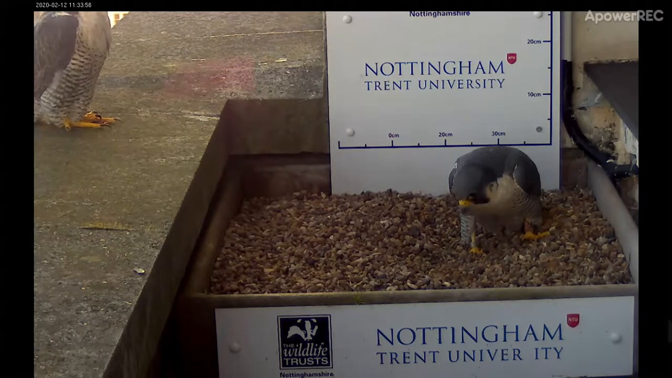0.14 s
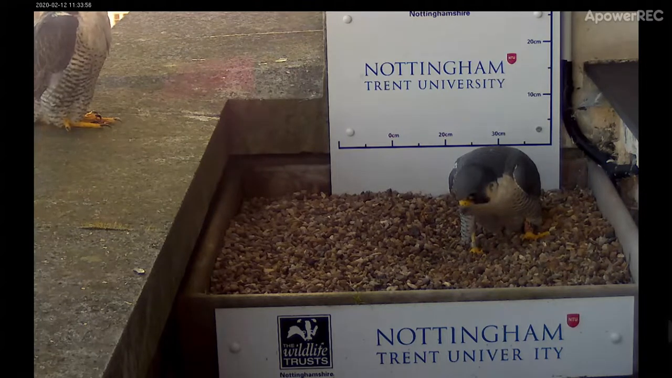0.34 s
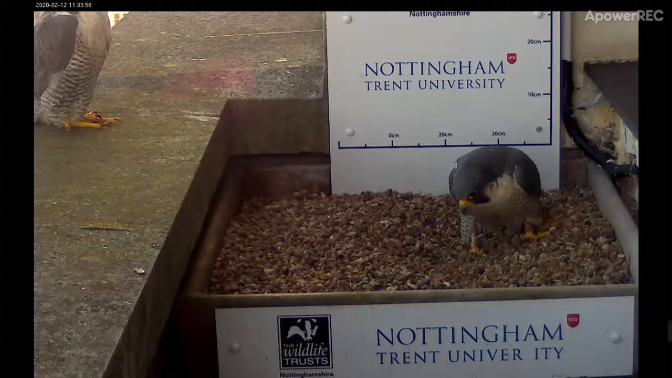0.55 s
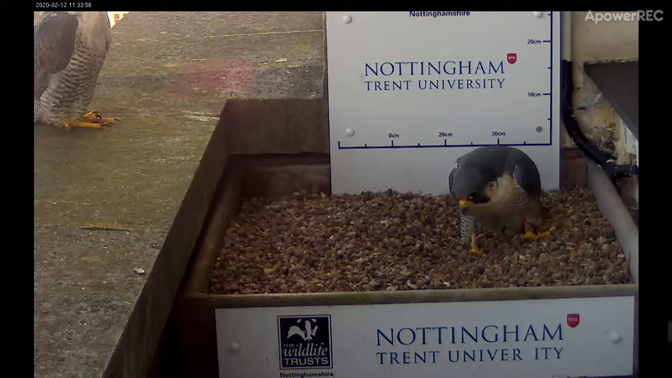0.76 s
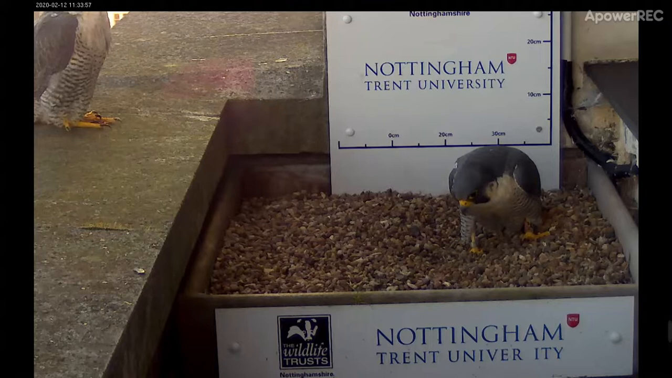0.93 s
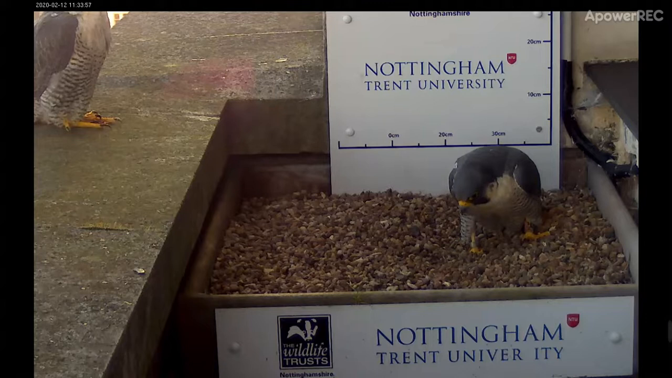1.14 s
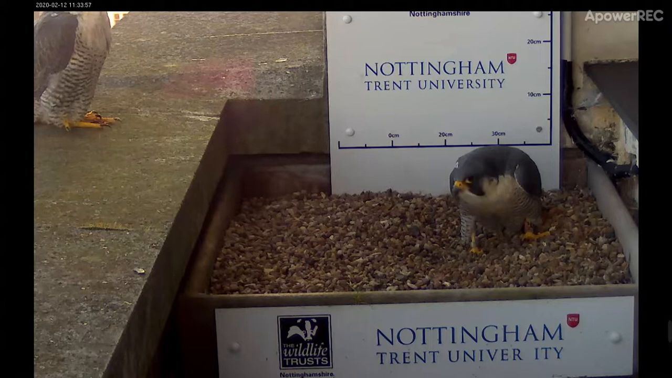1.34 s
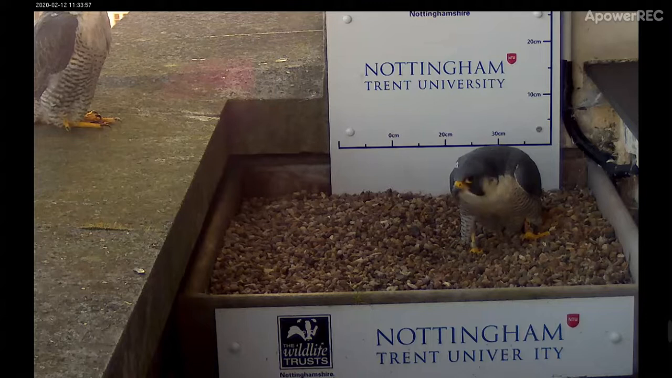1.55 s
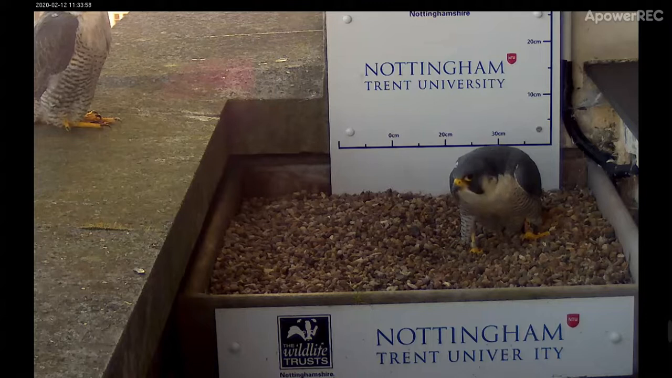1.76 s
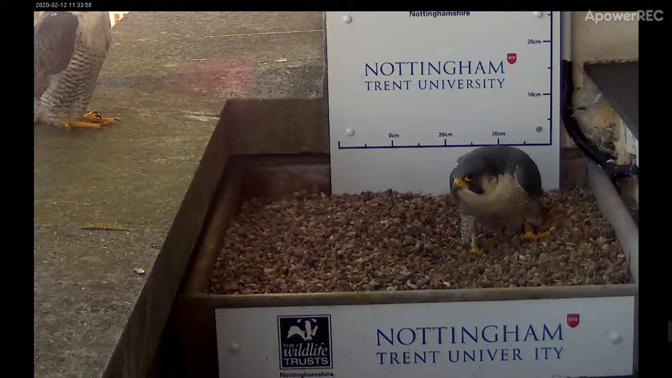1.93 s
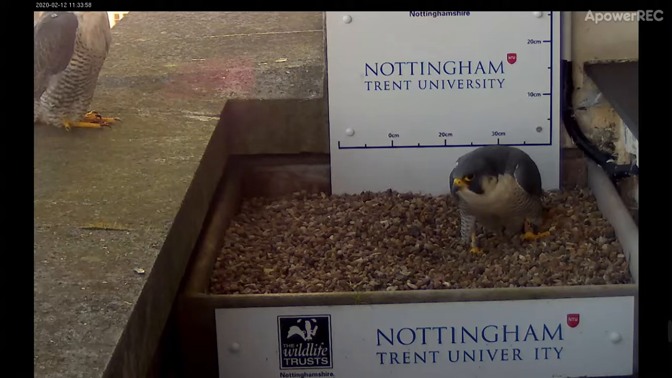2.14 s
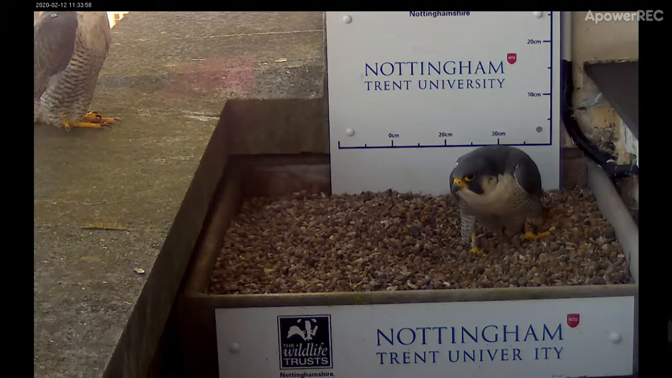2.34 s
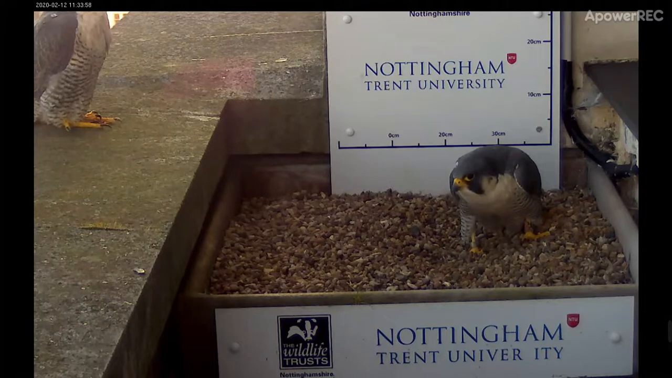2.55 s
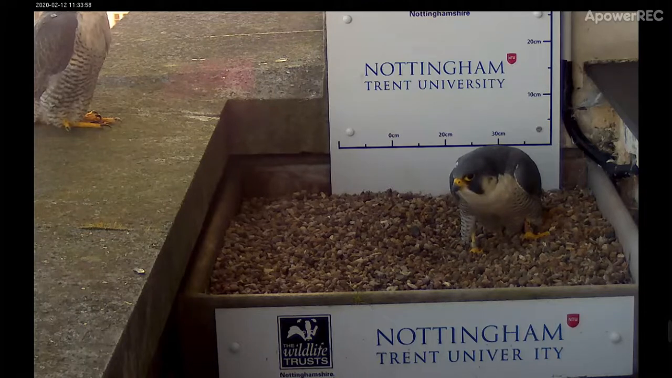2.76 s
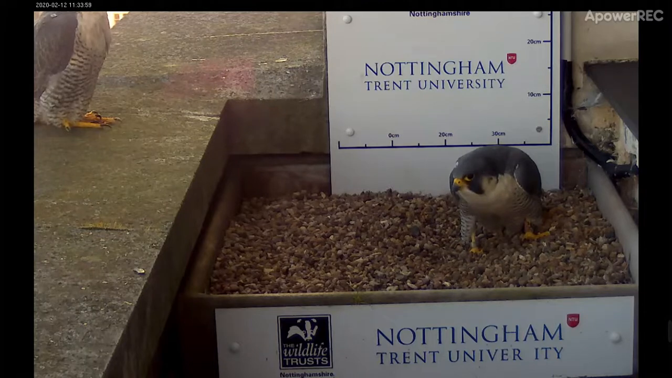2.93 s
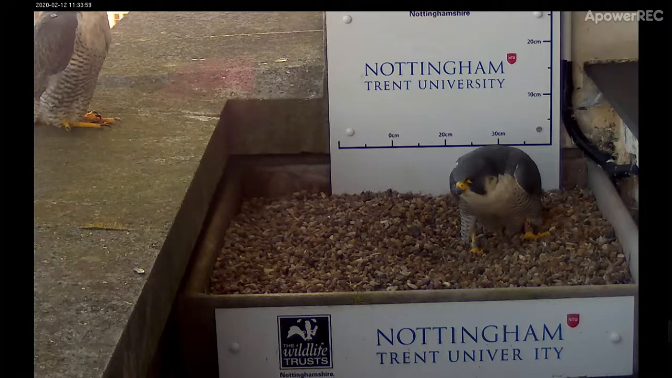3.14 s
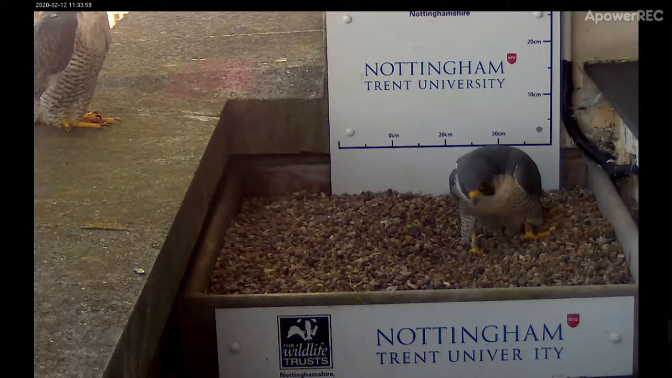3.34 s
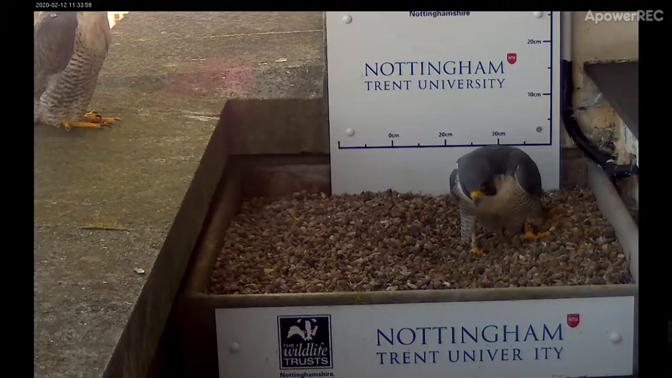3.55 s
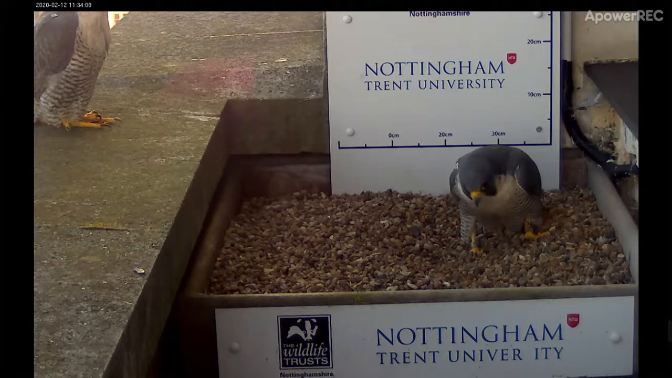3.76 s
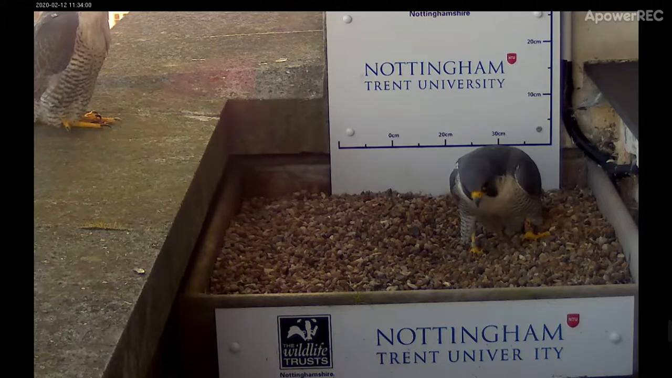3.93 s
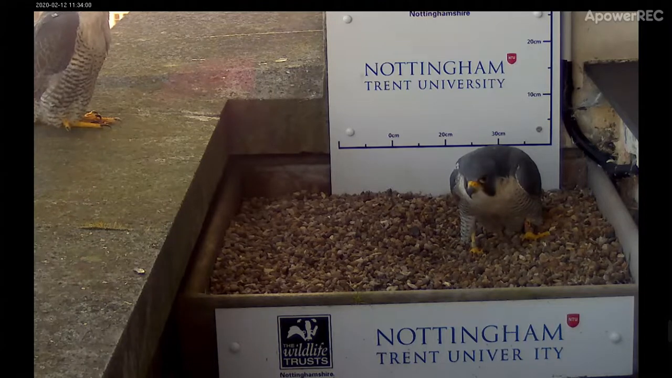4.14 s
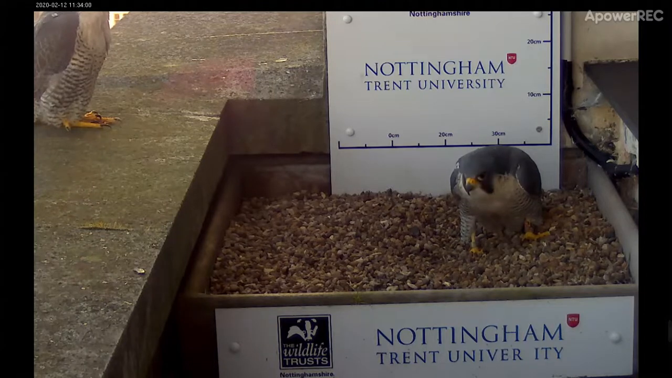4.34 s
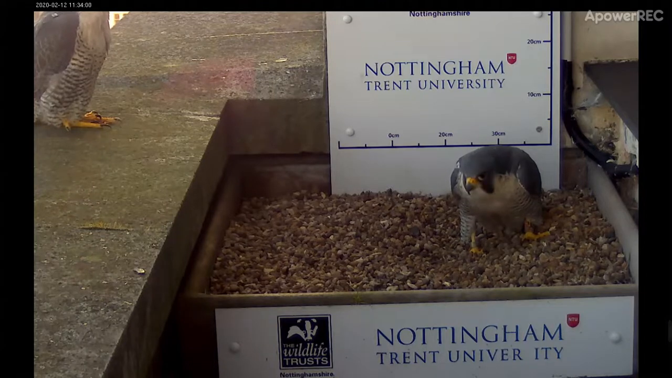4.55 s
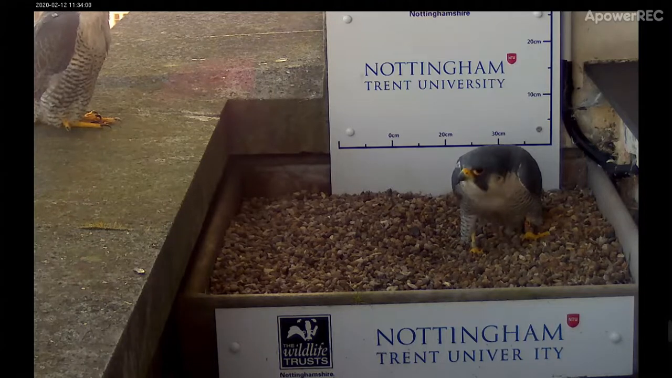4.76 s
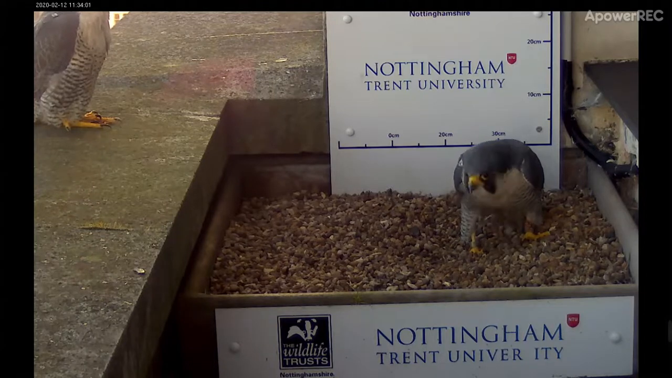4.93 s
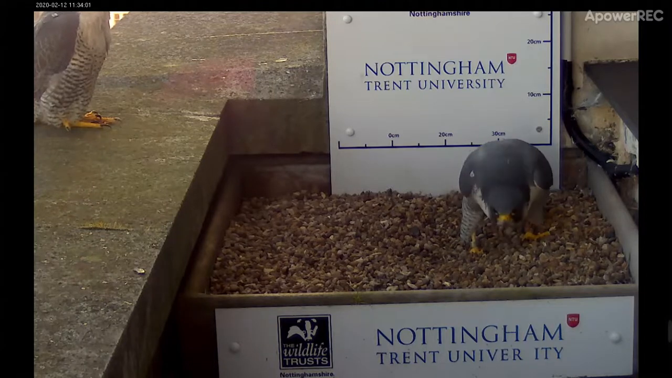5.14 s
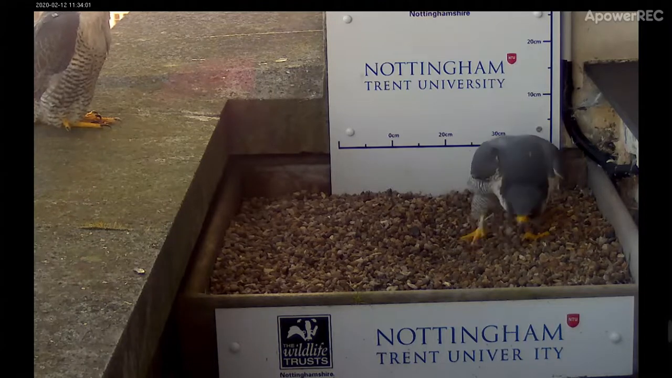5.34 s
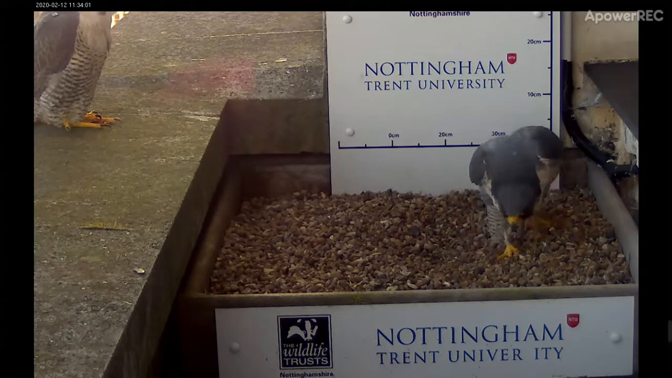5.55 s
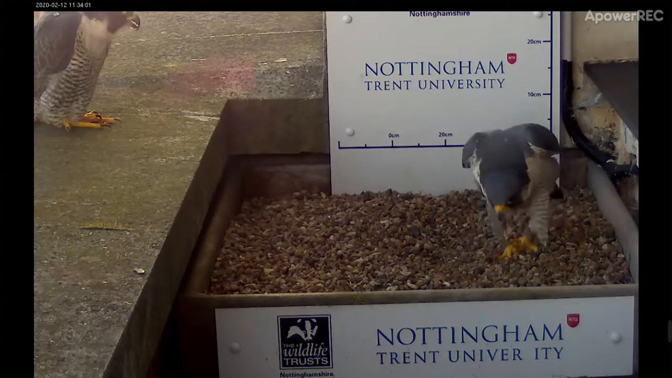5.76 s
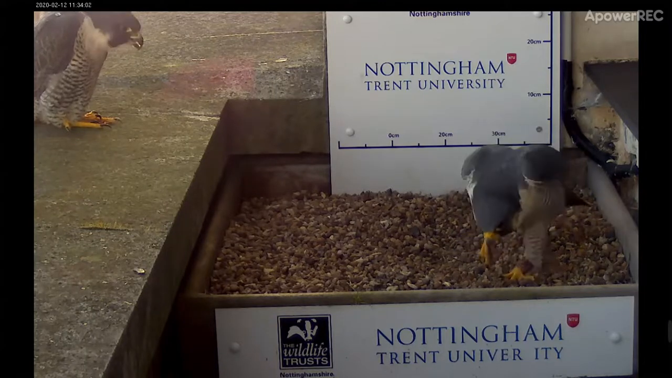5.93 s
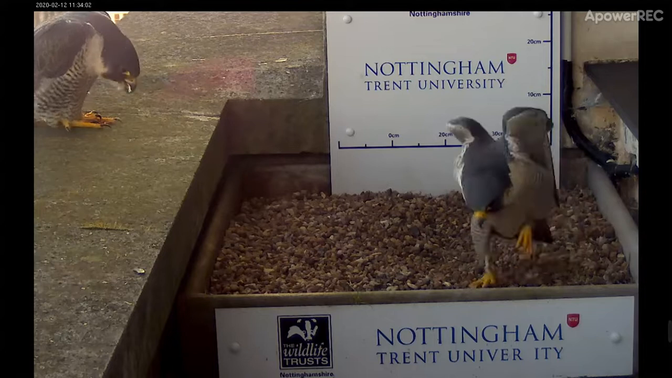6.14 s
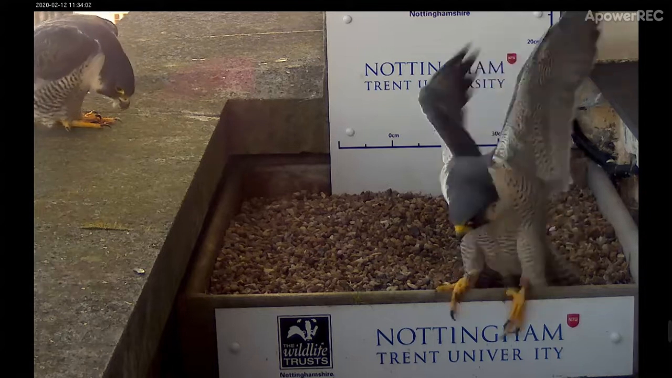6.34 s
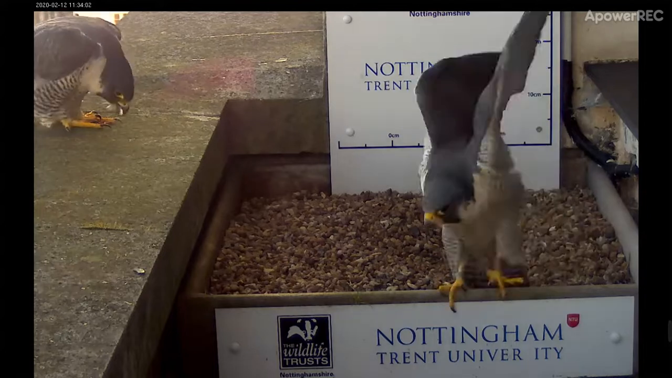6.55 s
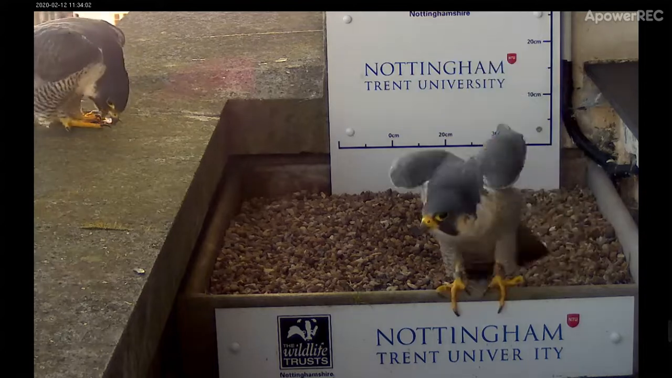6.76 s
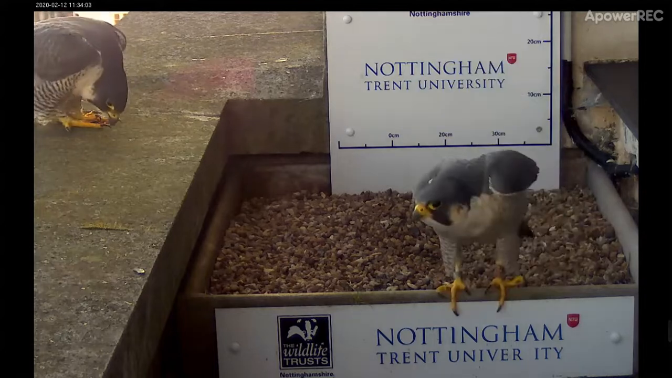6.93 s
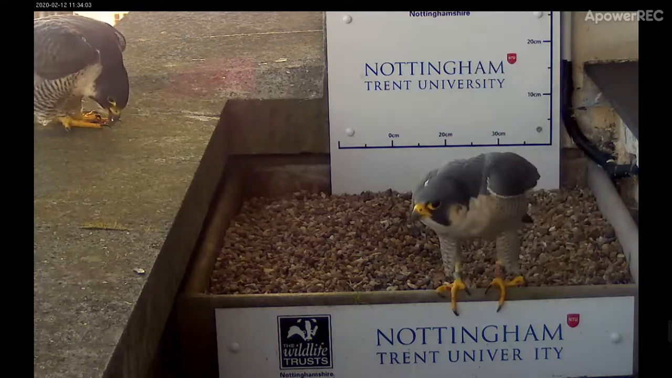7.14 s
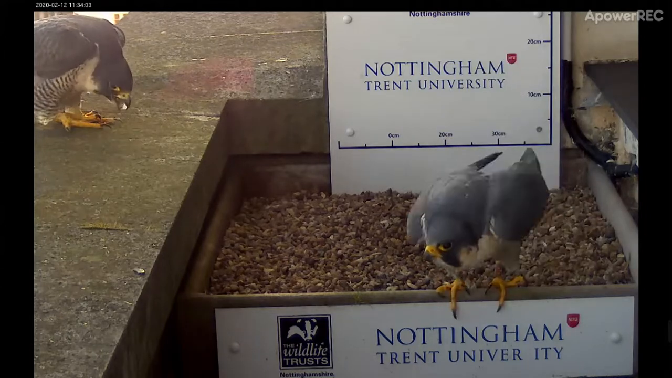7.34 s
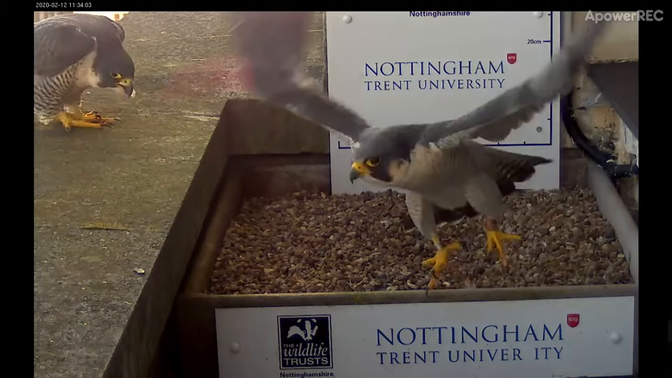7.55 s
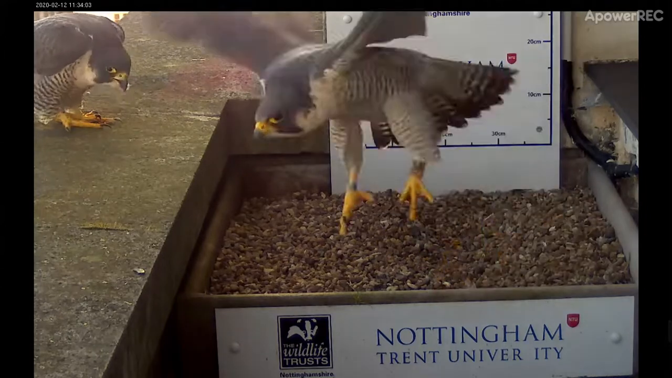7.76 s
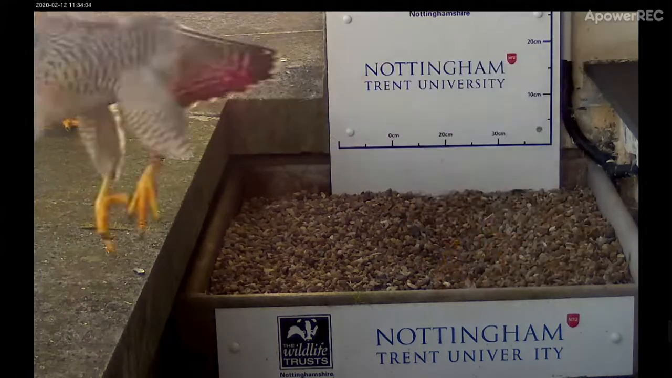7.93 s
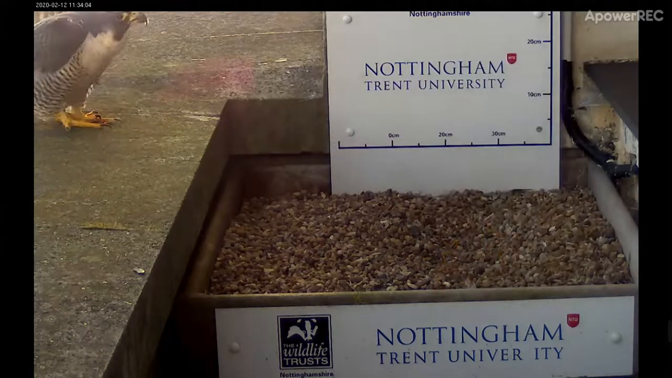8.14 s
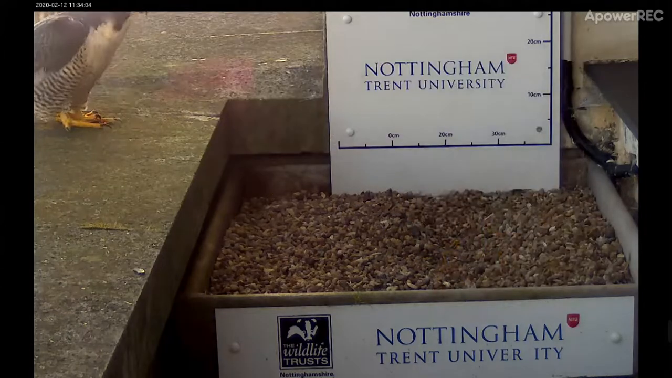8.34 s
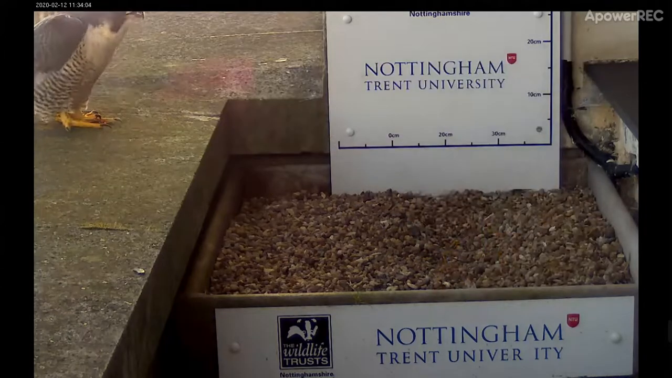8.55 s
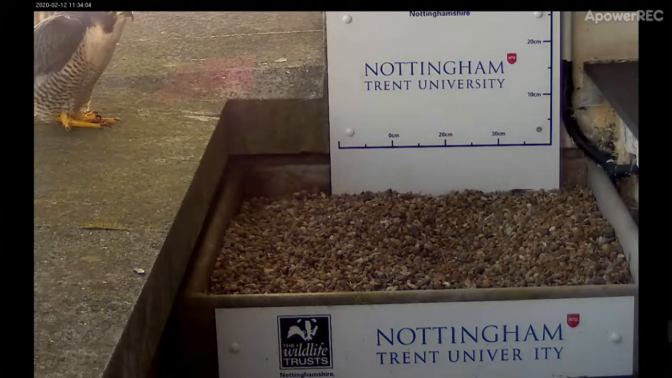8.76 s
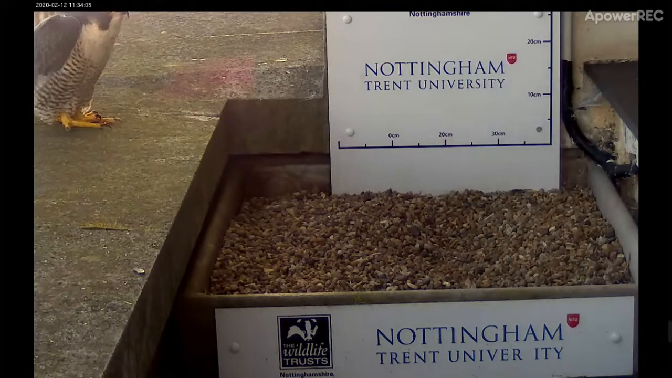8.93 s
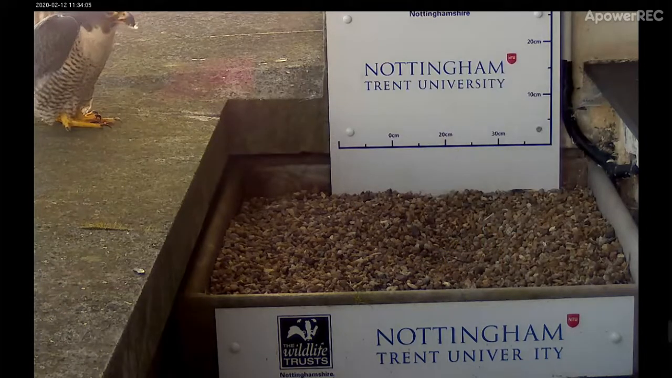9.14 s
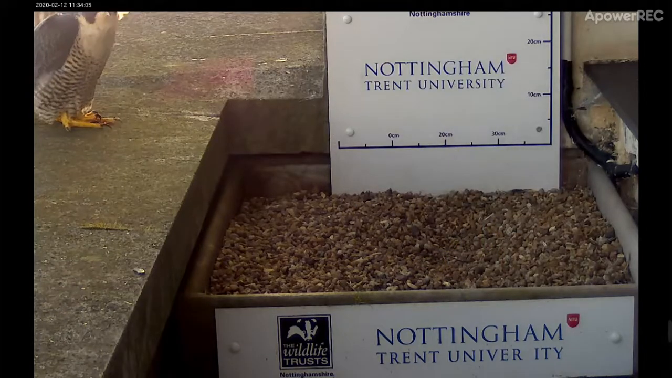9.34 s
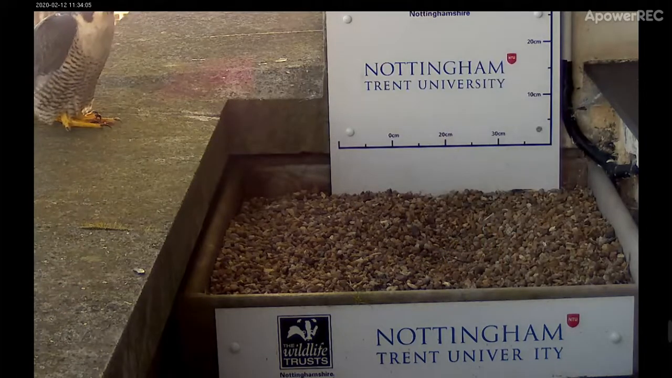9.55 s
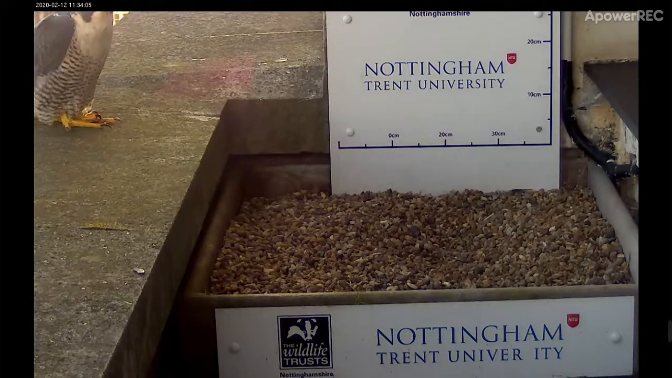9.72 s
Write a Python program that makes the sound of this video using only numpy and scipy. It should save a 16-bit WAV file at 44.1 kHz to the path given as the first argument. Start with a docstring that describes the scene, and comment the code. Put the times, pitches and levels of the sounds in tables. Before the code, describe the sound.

A steady low electrical hum with faint rumble and hiss runs throughout, its thin upper buzz wavering slightly. A very faint, high, distant squeal comes and goes until about 1.2 seconds. One small dry tick falls at 1.7 seconds, and a falcon close to the microphone gives two soft, brief whines around 2 seconds. Only the hum and hiss follow until 5.8 seconds, when a string of quiet whines begins. Talons scuff faintly on the rim of the nest box at 6.6 seconds. From 6.8 to 8.3 seconds come three loud, quick calls, each a short rasp and a high sliding wail that breaks and ends in a sharp chup. A single rasp follows at 8.7 seconds, then two shorter, softer squeaky chups at about 9 and 9.5 seconds. The box adds short, tight echoes to the calls.

```python
"""Peregrine falcon in a nest box

A falcon calls in a gravel nest box on a ledge, close to a humming nest camera. Soft whines grow
into "ee-chup" calls: a rasp, a sliding wail that breaks between registers, then a sharp chup from
both sides of the syrinx at once. The box adds short echoes. Behind the calls: rumble and hiss,
a faint far squeal, one tick and a scuff of talons."""
import sys
import numpy as np
from scipy import signal
from scipy.fft import rfft, irfft
from scipy.io import wavfile

SR = 44100
rng = np.random.default_rng(int(sys.argv[2]) if len(sys.argv) > 2 else 0)


def store_pcm(level_fs):
    """Save levels as 16-bit WAV."""
    pcm = np.round(np.clip(level_fs, -1, 1) * 32767).astype(np.int16)
    wavfile.write(sys.argv[1], SR, np.atleast_2d(pcm).T)


N = 436149
TIME = np.arange(N) / SR


def from_db(db):
    """Decibels to gain."""
    return 10 ** (np.asarray(db) / 20)


def unit_rms(x):
    """Scale to rms 1."""
    return x / np.sqrt(np.mean(x ** 2) + 1e-20)


def drift(per_s, size):
    """Interpolated random curve, spread about 1."""
    steps = np.arange(size) * per_s / SR
    knots = int(steps[-1]) + 2
    return 1.2 * np.interp(steps, np.arange(knots), rng.standard_normal(knots))


def coloured(spectrum, size):
    """Noise of rms 1, shaped by rows of f/Hz, gain/dB."""
    hz, db = np.transpose(spectrum)
    bins_hz = np.maximum(np.fft.rfftfreq(size, 1 / SR), 1)
    gain = from_db(np.interp(np.log(bins_hz), np.log(hz), db))
    return unit_rms(irfft(rfft(rng.standard_normal(size)) * gain, size))


def resonate(x, modes):
    """Parallel resonances of alternating sign."""
    out = 0
    for k, (hz, width_hz, db) in enumerate(modes):
        r = np.exp(-np.pi * width_hz / SR)
        ring = signal.lfilter([1, 0, -1], [1, -2 * r * np.cos(2 * np.pi * hz / SR), r * r], x)
        out = out + (-1) ** k * from_db(db) * (1 - r * r) / 2 * ring
    return out


def gate(t, start_s, end_s, rise_s, fall_s):
    """Open from start to end, rounded edges outside."""
    ramp = np.minimum(1 + (t - start_s) / rise_s, 1 + (end_s - t) / fall_s)
    return np.sin(np.pi / 2 * np.clip(ramp, 0, 1)) ** 2


def phase_of(hz, jitter, per_s=1500):
    """Running phase of an oscillator with trembling pitch."""
    return 2 * np.pi * (rng.random() + np.cumsum(hz * (1 + jitter * drift(per_s, len(hz)))) / SR)


def add(track, start_s, sound):
    """Mix a sound in at a time."""
    at = int(start_s * SR)
    track[at:at + len(sound)] += sound[:N - at]


# Noise floor spectrum: f/Hz, relative density/dB
FLOOR_SPECTRUM = [(25, 1), (60, 4.5), (110, 0.5), (200, 0), (330, -1), (450, -8.5), (700, -12.5),
                  (1050, -14.5), (2000, -12), (3300, -20.5), (5000, -18), (6800, -20), (8000, -28.5)]
# Camera housing resonances: f/Hz, width/Hz, gain/dB
HOUSING_MODES = [(1189.5, 67, 2), (1354.8, 130, -4.5), (1634.1, 79, -3), (2296.6, 140, -4.5),
                 (2483, 150, -3.5), (2881.7, 260, -5), (3706.3, 100, -8), (4448.7, 250, -13)]


def background(floor_db=-60, housing_db=-62, waver_db=0.1149):
    """Even rumble and hiss, partly ringing in the camera housing."""
    housing = unit_rms(resonate(rng.standard_normal(N), HOUSING_MODES))
    floor = from_db(floor_db) * coloured(FLOOR_SPECTRUM, N)
    return floor + from_db(housing_db - waver_db * drift(3.5, N)) * housing


# Spells of lower housing buzz: t/s, length/s, lower overtone level/dB
BUZZ_SPELLS = [(3.333, 0.3043, -68), (4.657, 0.3652, -68.5), (5.388, 0.8361, -64.5), (9.523, .35, -67.5)]


def buzz(lower_rest_db=-75.5, upper_rest_db=-68.5, duck_db=4, shift_s=0.097):
    """Two housing overtones trade strength; returns (harmonic number, dB over time) for each."""
    lower_db, upper_db = lower_rest_db, upper_rest_db
    for start_s, length_s, db in BUZZ_SPELLS:
        spell = gate(TIME, start_s, start_s + length_s, shift_s, shift_s)
        lower_db = lower_db + (db - lower_rest_db) * spell
        upper_db = upper_db - duck_db * spell
    return [(28, lower_db), (38, upper_db)]


# Camera hum: harmonic number, rms level/dB
HUM_HARMONICS = [(1, -70.5), (2, -42.5), (3, -61), (4, -50), (5, -64.5), (6, -53), (7, -73), (8, -80),
                 (9, -73), (10, -74), (11, -78.5), (12, -84.5), (13, -81.5), (14, -88.5), (15, -77),
                 (19, -81.5), (21, -65.5), (22, -73), (23, -79), (27, -83.5), (29, -80), (33, -77.5),
                 (37, -85), (39, -71.5), (47, -73.5), (48, -78.5), (49, -83), (50, -76.5)]


def hum(fundamental_hz=58.39, waver_db=1.0, wander_rad=0.27):
    """The camera hums steadily; its high overtones waver as the housing buzzes."""
    out = np.zeros(N)
    for harmonic, db in HUM_HARMONICS + buzz():
        hz = harmonic * fundamental_hz
        looseness = min(hz / 1200, 1)
        phase = 2 * np.pi * (hz * TIME + rng.random()) + looseness * wander_rad * drift(9, N)
        out += np.sqrt(2) * from_db(db + looseness * waver_db * drift(4, N)) * np.sin(phase)
    return out


# Far squeal: t/s, length/s, mid f/Hz, level/dB
SQUEAL_PIECES = [(0.149, 0.1722, 4107, -72), (.37, 0.0931, 4106, -74.5), (.51, 0.0693, 4090, -71.5),
                 (0.608, 0.1114, 4072, -73), (0.726, 0.09173, 4026, -66.5), (0.848, 0.1109, 3999, -68.5),
                 (1.022, 0.2195, 4013, -71.5)]


def squeal(sag_hz_per_s=200, flutter_db=2.0, edge_s=.015, jitter=.004):
    """A thin far tone comes and goes; each piece sags in pitch and wavers in strength."""
    out = np.zeros(N)
    for start_s, length_s, hz, db in SQUEAL_PIECES:
        t = np.arange(0, length_s + edge_s, 1 / SR)
        level = from_db(db + flutter_db * drift(40, len(t))) * gate(t, edge_s, length_s, edge_s, edge_s)
        phase = phase_of(hz - sag_hz_per_s * (t - length_s / 2), jitter)
        add(out, start_s, np.sqrt(2) * level * np.sin(phase))
    return out


def tick(start_s=1.7393, db=-36, decay_s=.002):
    """One small dry tick."""
    return -from_db(db) * (TIME >= start_s) * np.exp(-np.abs(TIME - start_s) / decay_s)


def landing(start_s=6.592, db=-57, decay_s=0.04485):
    """Talons scuff the rim of the box."""
    t = TIME[:SR // 8]
    scuff = coloured([(800, -21.5), (2500, -1.5), (4200, 9), (7000, -4.5)], len(t))
    out = np.zeros(N)
    add(out, start_s, from_db(db) * np.exp(-t / decay_s) * scuff)
    return out


# Box wall reflections: delay/s, gain/dB
WALL_ECHOES = [(.0031, -10.5), (.0074, -11), (0.013, -15.5), (0.0211, -19)]
# Box ring spectrum: f/Hz, relative density/dB
RING_SPECTRUM = [(900, 4), (1250, 13), (2000, 3.5), (3000, -0.5), (3700, -1), (4500, -0.5), (5400, -7.5),
                 (6300, 4.5), (7500, -2)]


def nest_box(x, t60_s=0.13062, ring_db=-12, build_s=0.0098):
    """Direct sound, a few wall echoes, then a short dense ring."""
    t = TIME[:SR // 3]
    envelope = from_db(-60 * t / t60_s) * (1 - np.exp(-(t / build_s) ** 2))
    response = coloured(RING_SPECTRUM, len(t)) * envelope
    response *= from_db(ring_db) / np.sqrt(np.sum(response ** 2))
    response[0] += 1
    for delay_s, db in WALL_ECHOES:
        response[int(delay_s * SR)] += from_db(db)
    return signal.fftconvolve(x, response)[:N]


def syrinx(t, hz, harmonics_db, jitter, onset_jitter, h4_re_h2_db, end_jitter=.022, tremble=0.0072,
           break_s=0.003, air_db=-23, onset_air_db=-16, shimmer_db=1.5043, rise_s=0.0022, fall_s=0.0032):
    """One side sings harmonics h1-h4, rough until it locks in and again as it lets go."""
    catching = np.exp(-t / break_s)
    releasing = np.exp(-(t[-1] - t) / break_s)
    pitch_hz = hz * (1 + tremble * drift(200, len(t)))
    phase = phase_of(pitch_hz, jitter + onset_jitter * catching + end_jitter * releasing)
    gains = [from_db(db) for db in harmonics_db]
    gains.append(gains[1] * from_db(h4_re_h2_db))
    tone = np.sqrt(2) * sum(gain * np.sin(k * phase) for k, gain in enumerate(gains, 1))
    turbulence = gains[1] * (from_db(air_db) + from_db(onset_air_db) * catching)
    air = turbulence * coloured([(900, -20.5), (2500, 10), (5000, 2.5), (8000, -17)], len(t))
    flutter = from_db(shimmer_db * drift(260, len(t)))  # uneven airflow
    return (tone + air) * flutter * gate(t, rise_s, t[-1] - fall_s, rise_s, fall_s)


# Soft whines: t/s, length/s, start f/Hz, mid f/Hz, end f/Hz, h1, h2, h3 level before trim/dB, fade/dB
WHINE_NOTES = [(1.857, 0.05389, 2062, 2038, 1847, -49.5, -39, -48, 14),
               (2.159, 0.05579, 1769, 1875, 1775, -63.5, -43.5, -59, 0),
               (5.795, 0.06965, 2007, 2071, 1938, -52, -51.5, -56.5, 4.5),
               (5.978, 0.0935, 1776, 1784, 1734, -63.5, -50.5, -53, 5),
               (6.177, 0.05214, 1814, 1876, 1839, -59, -50, -60.5, 6),
               (6.225, 0.02412, 1852, 1774, 1706, -59.5, -61, -49.5, -0.5),
               (6.273, .022, 1740, 1776, 1789, -61, -62.5, -51.5, -0.5),
               (6.302, 0.10858, 3093, 3169, 3066, -53, -53, -84.5, 4),
               (6.918, 0.04642, 1660, 1805, 1894, -72, -38, -66, -6),
               (6.963, 0.0574, 1685, 1715, 1792, -74.5, -69.5, -40.5, -3),
               (7.583, 0.07278, 1786, 1859, 1945, -74, -40, -70.5, 10),
               (7.677, 0.01003, 2170, 2262, 2244, -73.5, -40, -76, 6.5),
               (8.171, 0.0498, 1755, 1843, 1873, -80, -36.5, -59, 6.5),
               (8.199, 0.03287, 2193, 2200, 2228, -71.5, -39.5, -74.5, 11.5),
               (9.019, 0.02694, 1636, 1818, 1877, -71.5, -31.5, -63, -1.5),
               (9.052, 0.006736, 2308, 2226, 2087, -66.5, -31.5, -58, -4.5),
               (9.45, 0.017735, 1707, 1798, 1936, -78, -30, -58, -12.5),
               (9.468, 0.022, 1759, 1772, 1782, -88, -59.5, -36.5, 11)]


def whine(length_s, start_hz, mid_hz, end_hz, h1_db, h2_db, h3_db, fade_db,
          edge_db=-5.5, onset_db=-7.5, onset_s=0.0087, release_s=.003):
    """Pitch bends in one arc while the level swells and fades; the throat favours one harmonic."""
    t = np.arange(0, length_s + release_s, 1 / SR)
    along = np.clip(2 * t / length_s - 1, -1, 1)
    hz = np.polyval(np.polyfit([-1, 0, 1], [start_hz, mid_hz, end_hz], 2), along)
    onset = np.clip(1 - t / min(onset_s, length_s / 3), 0, 1)
    swell_db = edge_db * along ** 2 - fade_db * along / 2 + onset_db * onset
    harmonics_db = [db + swell_db for db in (h1_db, h2_db, h3_db)]
    return syrinx(t, hz, harmonics_db, jitter=.003, onset_jitter=.02, h4_re_h2_db=-22)


# Rough patches in the voice: t/s, length/s, centre f/Hz, sideband spacing/Hz, level before trim/dB
VOICE_SPLITS = [(6.82, 0.00884, 4476, 1092, -42.5), (6.909, 0.02785, 4685, 697.8, -46.5),
                (7.583, 0.03552, 4418, 880, -53), (8.06, 0.02752, 4959, 687, -38.5),
                (8.161, 0.008, 5447, 1024, -40), (9.017, 0.014, 4672, 745, -39.5),
                (9.068, 0.005753, 4780, 916.9, -32.5), (9.45, 0.01778, 5325, 788.4, -40.5)]


def split(length_s, hz, spacing_hz, db, depth_rad=1.3667, jitter=0.0095, unevenness=0.16):
    """A slower, uneven second vibration shakes the voice into sidebands."""
    t = np.arange(0, length_s + .008, 1 / SR)
    shake = np.sin(phase_of(np.full(len(t), spacing_hz), unevenness))
    tone = np.sin(phase_of(np.full(len(t), hz), jitter) + depth_rad * shake)
    return np.sqrt(2) * from_db(db) * tone * gate(t, 0.0016, length_s, .002, 0.0082)


# Upper throat resonances: f/Hz, width/Hz, gain/dB
THROAT_HIGH_MODES = [(2472, 170, -3), (2803, 120, -1.5), (3574.5, 340, -1.5), (4590, 750, -9.5),
                     (5244.4, 66, -2), (6343, 410, -18)]
# Lower throat resonances: f/Hz, width/Hz, gain/dB
THROAT_LOW_MODES = [(1262.8, 87, -3), (1629, 63, 1.5)]
# Rasps: t/s, length/s, level before trim/dB, pulse rate/Hz, tone f/Hz, tone re pulses/dB, low modes/dB
RASP_NOTES = [(1.849, 0.01125, -56, 406, 2947, 13.5, -7.5), (5.792, 0.009004, -53, 440, 3002, 13.5, -5.5),
              (6.387, 0.0219, -46, 400, 3000, -5.5, -3), (6.77, 0.02335, -35, 410, 3002, 0.5, 2.5),
              (7.026, 0.025, -44, 400, 2800, -12, -4.5), (7.42, 0.02712, -31.5, 420, 3043, 0.5, -1.5),
              (7.73, 0.016203, -34.5, 400, 2910, -1, 0.5), (8.026, 0.03464, -32.5, 400, 3004, -3.5, -1),
              (8.287, 0.026313, -31.5, 400, 2951, 2, -2), (8.698, 0.04887, -34.5, 420, 2960, 3.5, 4.5),
              (9.069, 0.02486, -50.5, 400, 2835, -7, 2.5), (9.497, 0.02121, -37, 400, 2792, -5, -8.5)]


def rasp(length_s, db, pulse_hz, tone_hz, tone_db, low_modes_db,
         unevenness=.06, sag=.08, jitter=0.021, shimmer_db=1.5, low_cut_hz=1000):
    """Uneven slow pulses ring in the throat, around a rough sagging tone."""
    t = np.arange(0, length_s + .03, 1 / SR)
    cycles = phase_of(np.full(len(t), pulse_hz), unevenness, per_s=400) // (2 * np.pi)
    pulses = np.diff(cycles, prepend=cycles[0]) + .05 * rng.standard_normal(len(t))
    opening = gate(t, 0.006522, length_s - .006, 0.0064, 0.01)
    drive = pulses * opening * from_db(shimmer_db * drift(300, len(t)))
    throat = from_db(low_modes_db) * resonate(drive, THROAT_LOW_MODES)
    throat += resonate(drive, THROAT_HIGH_MODES)
    # a small beak radiates almost no lows
    throat = signal.sosfilt(signal.butter(2, low_cut_hz, "high", fs=SR, output="sos"), throat)
    throat /= np.sqrt(np.sum(throat ** 2) / np.sum(opening ** 2))
    tone = np.sqrt(2) * np.sin(phase_of(tone_hz * (1 - sag * t / length_s), jitter))
    return from_db(db) * (throat + from_db(tone_db) * tone * opening)


# Loud "ee" scoops: t/s, length/s, loud part/s, time to lowest pitch/s, start f/Hz, lowest f/Hz,
# end f/Hz, h2 peak level/dB, h2 quiet level/dB, loud h1 re h2/dB, quiet h1 re h2/dB
WAIL_NOTES = [(6.793, 0.11625, 0.04817, 0.09647, 2348, 1949, 2048, -21, -40.5, -11, -4),
              (7.449, 0.13125, 0.019337, 0.06601, 2402, 1852, 2154, -18.5, -42, -2.5, -8.5),
              (8.066, .095, 0.020874, 0.066, 2408, 1827, 2250, -18, -43.5, -1.5, -10.5)]


def wail(length_s, loud_s, turn_s, start_hz, low_hz, end_hz, peak_db, quiet_db, h1_loud_db, h1_quiet_db,
         h3_loud_db=-27, h3_quiet_db=-12, bend=1.5, hold_s=0.0062, onset_db=-12, attack_s=.007,
         droop_db_per_s=167, collapse_s=0.0049, dip_db=7.5, dip_s=0.014):
    """A loud high start slides down, collapses to a thin hoarse tone, and climbs again."""
    t = np.arange(0, length_s, 1 / SR)
    falling = np.clip((turn_s - t) / (turn_s - hold_s), 0, 1)
    rising = np.clip((t - turn_s) / (length_s - turn_s), 0, 1)
    hz = low_hz + (start_hz - low_hz) * falling ** bend + (end_hz - low_hz) * rising ** bend
    loud = (1 - np.tanh((t - loud_s) / (2 * collapse_s))) / 2
    quiet = 1 - loud
    loud_db = peak_db + onset_db * np.clip(1 - t / attack_s, 0, 1) - droop_db_per_s * (t - attack_s)
    falter = np.exp(-((t - turn_s) / dip_s) ** 2)  # the voice nearly fails at its lowest pitch
    h2_db = loud * loud_db + quiet * (quiet_db - dip_db * falter)
    h1_db = h2_db + loud * h1_loud_db + quiet * h1_quiet_db
    h3_db = h2_db + loud * h3_loud_db + quiet * h3_quiet_db
    jitter = .002 * loud + .01 * quiet
    return syrinx(t, hz, [h1_db, h2_db, h3_db], jitter, onset_jitter=.012, h4_re_h2_db=-32)


# Throat and open beak resonances: f/Hz, width/Hz, gain/dB
BEAK_MODES = [(3000, 640, 1), (4464, 530, 3.5), (5226, 150, -9.5), (6452.4, 290.3, 3)]
# Chups: t/s, start f/Hz, settled f/Hz, glide/s, swell/s, length/s, level/dB,
# second voice f/Hz, its octave re first voice/dB
CHUP_NOTES = [(6.388, 3182, 2853, 0.004302, 0.004097, 0.007225, -39.5, 2487, 3.5),
              (7.012, 4893, 3019, 0.003618, 0.012919, 0.018857, -24, 2111, 0.5),
              (7.712, 4010, 3046, 0.004771, 0.011539, 0.017776, -19, 2272, 2),
              (8.268, 4555, 2999, 0.002544, 0.008308, 0.02005, -17, 2209, -3),
              (9.058, 3672, 2784, 0.0062576, 0.005395, 0.024594, -30, 2000, -13),
              (9.484, 4652, 3023, 0.004755, 0.003903, 0.02414, -30, 2082, -6.5)]


def chup(start_hz, end_hz, glide_s, swell_s, length_s, db, second_hz, second_db, jitter=0.015,
         onset_db=-13, octave_db=-6, low_db=-6, sum_db=-14, difference_db=-18, air_db=-16, fall_s=0.0086):
    """A high voice drops and swells; the syrinx's other side joins, making combination tones."""
    t = np.arange(0, length_s + fall_s, 1 / SR)
    high_rad = phase_of(end_hz + (start_hz - end_hz) * np.exp(-t / glide_s), jitter)
    low_rad = phase_of(np.full(len(t), second_hz), jitter / 2)
    # the octave flares as it slides into the top beak resonance
    first = np.sin(high_rad) + from_db(octave_db) * resonate(np.sin(2 * high_rad), BEAK_MODES)
    second = np.sin(2 * low_rad) + from_db(low_db) * np.sin(low_rad)
    combination = from_db(sum_db) * np.sin(high_rad + low_rad)
    combination += from_db(difference_db) * np.sin(2 * high_rad - low_rad)
    air = from_db(air_db) * unit_rms(resonate(rng.standard_normal(len(t)), BEAK_MODES))
    joining = from_db(second_db) * gate(t, swell_s + 0.003249, length_s, 0.0036, fall_s)
    effort = from_db(db + onset_db * np.clip(1 - (t / swell_s) ** 2, 0, 1))
    opening = gate(t, 0.0008, length_s - fall_s / 2, .0012, fall_s)
    return np.sqrt(2) * effort * opening * (first + air + joining * (second + combination))


def falcon():
    """All the bird's notes, with a level trim per kind."""
    out = np.zeros(N)
    for notes, sound, trim_db in ((WAIL_NOTES, wail, 0), (WHINE_NOTES, whine, 1), (CHUP_NOTES, chup, 0),
                                  (RASP_NOTES, rasp, -3.5), (VOICE_SPLITS, split, -0.5)):
        for start_s, *shape in notes:
            add(out, start_s, from_db(trim_db) * sound(*shape))
    return out


def scene():
    """The bird in its box over the steady hum; mono."""
    return (nest_box(falcon() + landing()) + squeal() + hum() + background() + tick())[None]


def record(dry, on_s=.116, roll_off_hz=7150, cutoff_hz=7900):
    """The sound switches on after a moment; the treble rolls off, then is cut steeply."""
    live = dry * gate(TIME, on_s, TIME[-1], 0.000553, .002)
    dulled = signal.sosfilt(signal.butter(14, roll_off_hz, fs=SR, output="sos"), live)
    return signal.sosfilt(signal.ellip(10, .1, 70, cutoff_hz, fs=SR, output="sos"), dulled)


dry = scene()
out = record(dry)
store_pcm(out)
```